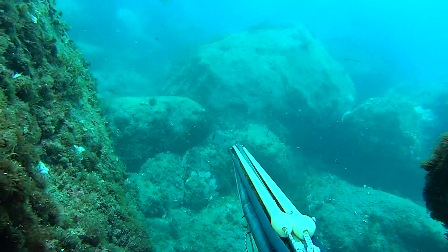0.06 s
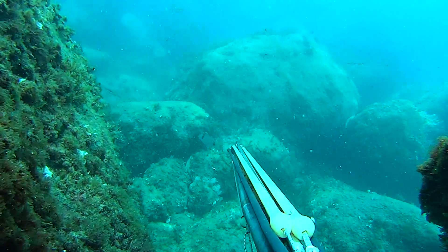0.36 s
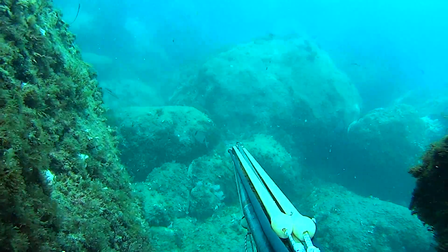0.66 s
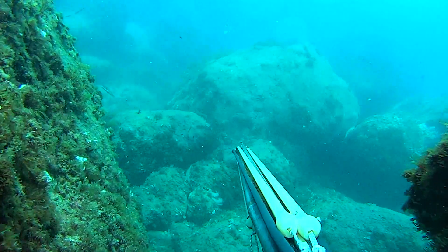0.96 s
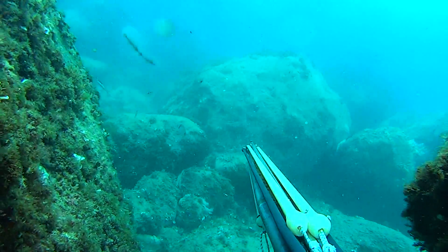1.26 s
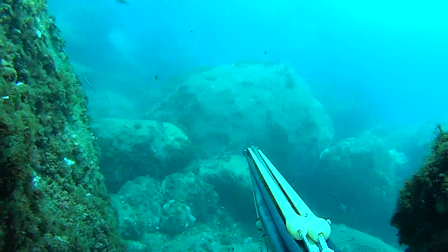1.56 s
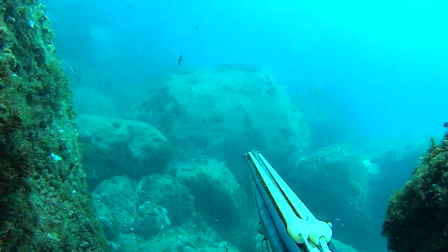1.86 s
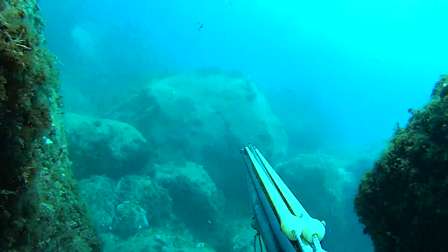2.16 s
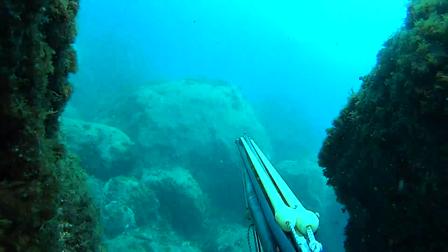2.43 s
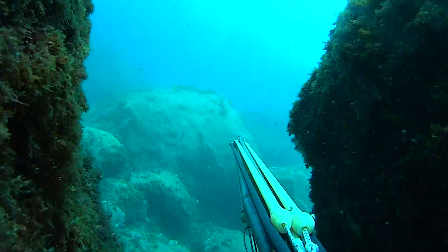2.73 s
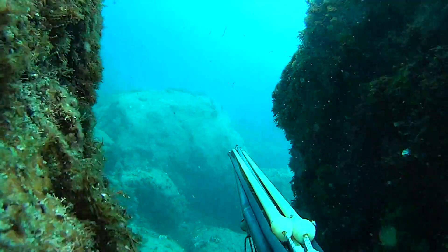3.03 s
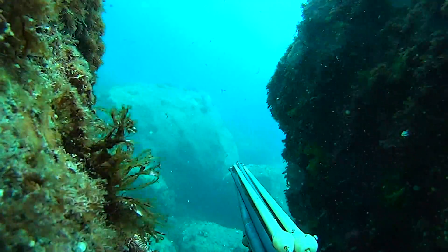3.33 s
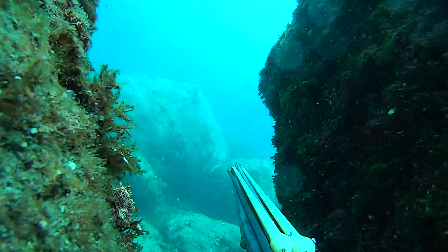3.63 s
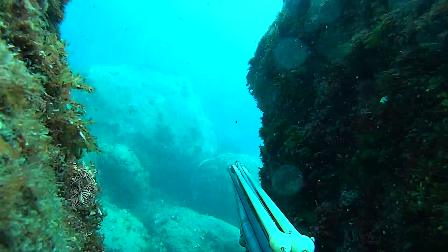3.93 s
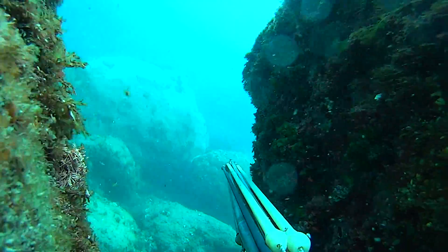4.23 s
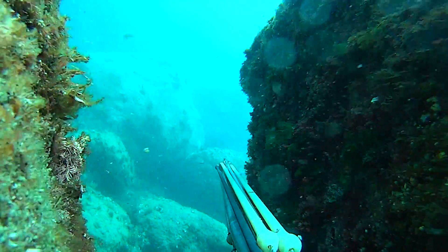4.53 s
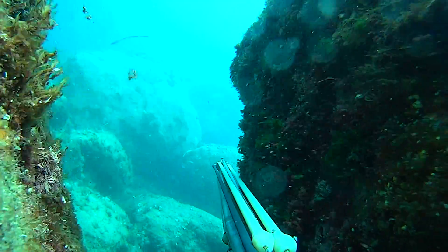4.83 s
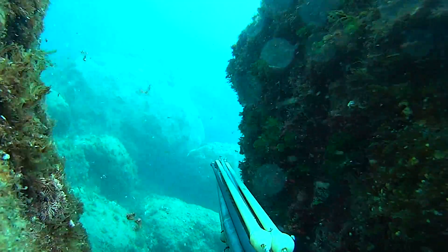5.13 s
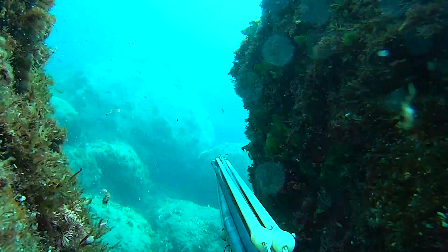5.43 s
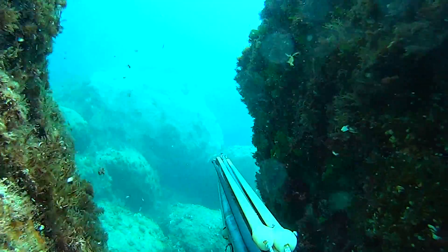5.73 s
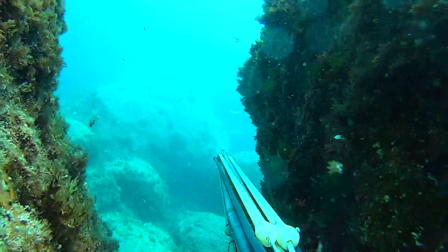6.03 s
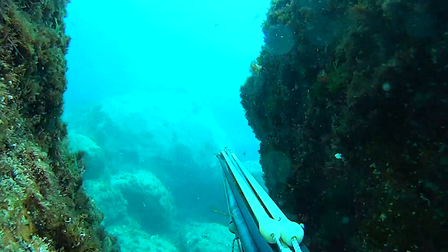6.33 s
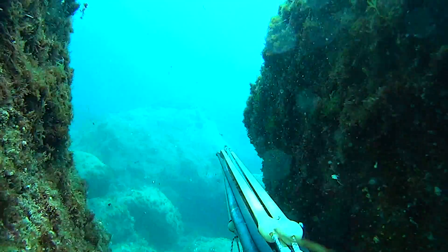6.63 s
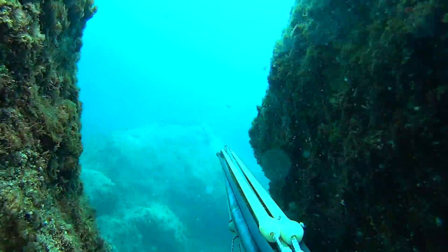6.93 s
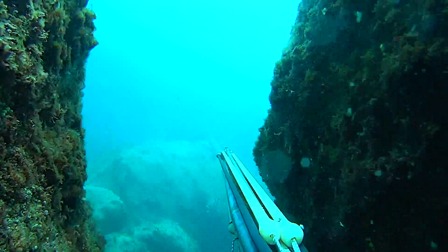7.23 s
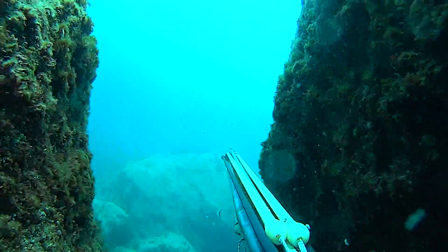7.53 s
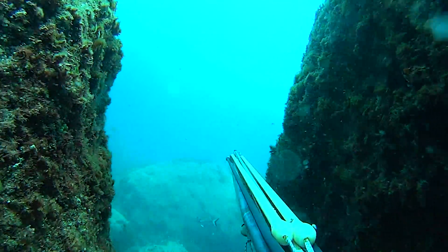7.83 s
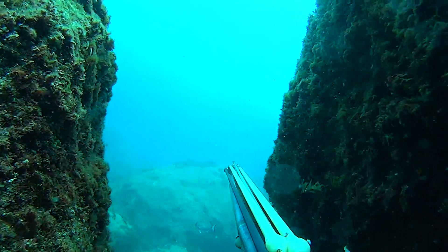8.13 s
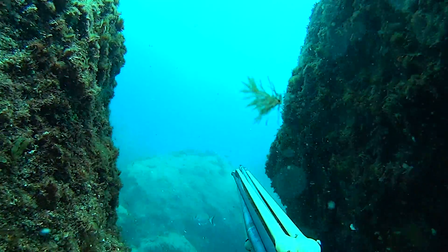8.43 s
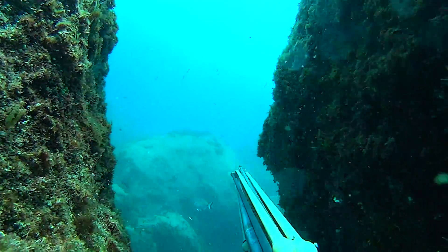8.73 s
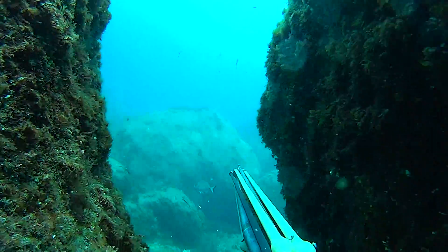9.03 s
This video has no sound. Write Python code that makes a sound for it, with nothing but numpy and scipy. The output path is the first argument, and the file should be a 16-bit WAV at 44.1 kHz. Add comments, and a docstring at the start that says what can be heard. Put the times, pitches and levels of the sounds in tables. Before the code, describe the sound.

Steady crackling clicks of shrimp in the sea, over a low hum that surges as a diver's camera housing bumps along rock.

```python
"""Under water between two rocks, heard through the plastic housing of a diver's camera.
From the start, snapping shrimp crackle all around: their collapsing bubbles ring the housing, and moving
water makes it hum near 600 Hz. At 1.3 s and 4.1 s the diver pulls along the rock: the water surges and
the housing knocks, bumps and scrapes. A brief third pull follows at 5.9 s. At 6 s and 9 s the nearest
snaps land as sharp cracks that make the recorder's limiter duck."""
import sys
import numpy as np
from scipy import signal
from scipy.io import wavfile
from scipy.ndimage import uniform_filter1d, minimum_filter1d

SR = 44100
rng = np.random.default_rng(int(sys.argv[2]) if len(sys.argv) > 2 else 0)


def wrap_up_sound(samples):
    """Save the sound to the file named by the first command line argument, as 16-bit audio."""
    columns = np.atleast_2d(samples).T
    # keep every value between -1 and 1, then stretch to whole-number steps
    tamed = np.clip(columns, -1, 1)
    steps = np.round(tamed * 32767).astype(np.int16)
    wavfile.write(sys.argv[1], SR, steps)


N = 400428

# foreground shrimp snaps, ahead of the layer trims:
# (time [s], echo scatter [ms], level [dB], knock offset [dB], fizz offset [dB], knock pitch [Hz])
SNAPS = [(0.1003, 0.45, -38, -18, -22.5, 2900), (0.1265, 0.9, -38, -12, -17, 2800),
         (0.171, 1, -36.5, -6, -22, 2900), (0.1964, 0.74, -37, -0.5, -21.0, 2790.0),
         (0.2555, 1, -38.5, -6, -20, 2900), (0.469, 1.5, -44.5, -2, -22, 2010),
         (0.5237, 1.9, -26.5, -10.5, -17, 2640), (0.5591, 0.7, -35, -9, -16, 3160.0),
         (0.58, 0.5, -39, -9, -9, 2530.0), (0.5985, 1.3, -34.5, -9, -20.0, 2700),
         (0.62, 4.8, -36, 1, -9, 3000), (0.6319, 0.062, -23, -16, -26, 2570),
         (0.7364, 0.45, -37.0, -9, -22, 3090.0), (0.7869, 1.2, -37, 6, -17, 2600),
         (0.9051, 3.8, -29.5, -15, -28.0, 2740.0), (0.97, 0.61, -36.5, -10, -9, 2820),
         (1.0746, 1.7, -37, -3, -27, 2970), (1.1179, 0.3, -29, -18, -32, 3100.0),
         (1.1307, 3.3, -30.5, -4.0, -24, 3040.0), (1.188, 2, -39.5, -3, -24, 3100),
         (1.264, 0.81, -33, -14, -16, 2980.0), (1.3144, 1.1, -31, -16, -18, 3210.0),
         (1.6168, 3, -32.5, -7, -17, 2200), (1.745, 2.3, -37.0, -8, -12, 3160.0),
         (1.7718, 0.54, -36, -11, -23.0, 2690.0), (1.8179, 1.1, -29, -3, -20.0, 2880),
         (1.9252, 2.0, -32.5, -10, -28.0, 3280.0), (1.9635, 0.62, -34, -14, -13.0, 2780.0),
         (1.9718, 0.52, -26, -20, -29, 3110.0), (2.0215, 1.4, -30, -7, -31, 3240.0),
         (2.0399, 0.05, -27, -30, -7, 3160.0), (2.115, 0.6, -37, -16.0, -8, 3170.0),
         (2.126, 2.5, -32, -7.5, -24, 2680), (2.1801, 1, -30.5, -12, -27.0, 2970.0),
         (2.2796, 0.98, -34, -3, -33, 2900.0), (2.3098, 1.3, -30, -8.5, -28, 3230.0),
         (2.3443, 2.8, -36.0, -20, -24, 3450.0), (2.3695, 4.1, -33, 1, -23, 2960),
         (2.3816, 1.4, -25.5, -7.5, -27.0, 2500), (2.3961, 3.2, -31, -2, -22.0, 2070.0),
         (2.5574, 2.6, -32.5, -12, -13.5, 2330.0), (2.7905, 2.5, -36, -2.5, -16, 2330),
         (2.9122, 1.8, -30.5, 4.5, -23, 3090), (2.96, 0.3, -41, -20, -22, 3100),
         (2.9665, 1.1, -38, 9, -23.0, 1970), (3.0375, 0.15, -34, -9, -19, 3210.0),
         (3.042, 4, -39, -16, -18, 3200), (3.1718, 0.84, -35, -23, -22, 3200.0),
         (3.2812, 0.4, -32, -27, -21, 3240.0), (3.2938, 1.3, -26, -13, -25, 3010.0),
         (3.3362, 0.83, -31.5, -17.0, -29, 3040.0), (3.5031, 1.2, -23.5, -8.5, -26, 2440),
         (3.5572, 2.5, -35.5, 0, -23.0, 2740), (3.6326, 0.34, -37, -11.0, -13, 2940.0),
         (3.6981, 6.9, -34, -9, -34, 2820.0), (3.7473, 4.2, -31.5, -14, -33, 3400.0),
         (3.8118, 0.33, -31, -0.5, -10.5, 2730), (3.8522, 1.6, -24, -3.5, -27, 2920),
         (3.8887, 2.3, -41, -14, -24, 2980.0), (3.9954, 0.1, -36.5, -32, -17, 2620.0),
         (4.0805, 0.96, -32, -6, -28, 1650.0), (4.1742, 2.3, -25.5, -8.5, -18, 3200),
         (4.1821, 0.057, -28.5, -8.5, -3.5, 3120), (4.2346, 0.2, -31.5, -10, -24, 3140.0),
         (4.2765, 1.3, -34.5, -7, -28, 2400), (4.4538, 0.97, -28, -5, -28, 2400),
         (4.4874, 1.1, -32, -11, -23, 2200), (4.53, 1.7, -42, 0, -24, 1600),
         (4.7009, 0.22, -33, -18, -17, 2500.0), (4.7181, 0.4, -35.5, -11.0, -29.0, 2960.0),
         (4.753, 2.7, -27.5, -9.5, -24.0, 2790.0), (4.8317, 0.62, -35, -1, -35, 3220),
         (4.8818, 0.94, -28, -1.5, -32, 2150), (4.9139, 1.5, -35.5, -9, -21, 3130.0),
         (4.98, 2, -40.5, -2.5, -24, 1900), (5.0702, 4.3, -36, -30.0, -23.0, 2570.0),
         (5.1135, 1.4, -27.5, -1.5, -21.0, 1880), (5.135, 1.7, -33.5, -5, -17, 2670),
         (5.209, 2.4, -37.5, -14, -27, 2540), (5.2722, 1.4, -40, -0.5, -30, 2230),
         (5.3026, 5.4, -36, -11, -28, 2330.0), (5.3192, 1.1, -35.5, -6.5, -24, 2060.0),
         (5.3708, 0.6, -27, -9.5, -23, 3000), (5.3864, 1.2, -32, -5.5, -30, 2690.0),
         (5.4288, 0.27, -31, -21, -21, 2520.0), (5.496, 0.6, -31.5, -11.5, -29, 1760.0),
         (5.5324, 0.59, -35.5, -7.5, -22, 2260.0), (5.6001, 2.7, -39, -8, -31, 2290.0),
         (5.632, 2.2, -40, -1, -24, 2000), (5.6473, 0.89, -36.5, -9, -21, 3010.0),
         (5.6718, 1.5, -33, -19.0, -28, 2590.0), (5.771, 2, -40, -2, -24, 2000),
         (5.8481, 2, -32.5, -5.5, -26, 1830), (5.874, 1.7, -39.5, -1.5, -13, 2000),
         (5.9602, 2, -34, 7.5, -23, 2830), (5.9864, 1.3, -27, -8.5, -28.0, 2000),
         (6.0493, 0.045, -12, -28, -16, 3090.0), (6.1043, 0.087, -36.5, -9, -18, 2680.0),
         (6.1605, 0.95, -26, -6, -15, 2170), (6.1937, 4.7, -34.5, -7.0, -26, 1950.0),
         (6.247, 2, -37.5, -3, -24, 2700), (6.3508, 0.2, -34, -26.0, -34.0, 2930.0),
         (6.4473, 0.83, -36, -3.5, -21.0, 1830.0), (6.512, 6.6, -35.5, -2.5, -23, 1900),
         (6.6507, 0.23, -29.5, -14, -29, 3250.0), (6.6816, 2.8, -29, -11, -19.5, 1980),
         (6.7615, 0.81, -29, -10, -16, 2450), (6.9176, 0.4, -36.5, -9, -23.0, 2370.0),
         (7.0248, 0.29, -37, -25.0, -22, 2090.0), (7.2099, 0.6, -38.5, 1, -18, 2410.0),
         (7.2286, 3, -32.5, -3.5, -25, 3040.0), (7.2434, 0.65, -27, -16, -25, 2220),
         (7.331, 1.5, -38, -3, -26, 3100), (7.6401, 1.2, -38.5, -12, -27, 2120.0),
         (7.6771, 1.4, -27, -9, -18, 2960), (7.7102, 0.25, -35.5, -14.0, -22.0, 2360.0),
         (7.8382, 0.086, -41.5, 0, 3, 3120.0), (7.9601, 1.5, -35.5, 9, -30, 2750),
         (8.038, 1.3, -43, -15, -17, 3100), (8.0768, 5.8, -33, -13, -19, 3150.0),
         (8.113, 0.7, -33.5, -25.0, -24, 2590.0), (8.2435, 2.3, -39.5, -2, -22, 2680),
         (8.274, 1.5, -40, -2, -24, 3100), (8.3089, 6.4, -31.5, -9.5, -22.0, 3200.0),
         (8.3524, 5.9, -32.5, -14, -25.0, 3120.0), (8.5315, 0.71, -38.5, 1, -20, 3100.0),
         (8.667, 1.5, -38.5, -3, -24, 3100), (8.6819, 1.7, -33, -11, -27, 1900.0),
         (8.8708, 1, -31, -27, -34, 2950.0), (8.979, 1.2, -39.5, 10.5, -27, 1630.0),
         (9.0086, 0.038, -11.5, -41, -19, 3010.0), (9.0765, 2.4, -26.5, -4, -25, 3230)]
# housing modes that a snap rings: (pitch [Hz], width [Hz], level [dB], right channel gain [signed ratio])
SNAP_MODES = [(1108, 105, 2.5, 0.52), (1625, 125, 5.5, 1), (1910, 96, -0.5, 0.93), (2360, 160, -4, 1),
              (3040, 290, 1, 0.96), (4120, 2800, -5, 0.99), (3901, 2370, -3, 0.72), (4741, 346, 7.5, 0.88),
              (5750, 980, -13, 0.94), (6201, 1640, -15.5, 0.78), (7400, 710, -11, 0.2),
              (8250, 990, -22.5, -0.35), (9040, 510, -23, 0.56), (9820, 370, -26, 0.26),
              (10750, 390, -30.5, 0.34)]
# fader ride on the far colony: (time [s], gain [dB])
COLONY_RIDE = [(0, -1.5), (1.2, 1.5), (2.4, 2.5), (3.05, -3), (3.7, 4), (4.4, 0.5), (5.8, 1.5), (7.2, 1),
               (9.08, 1)]
# low housing modes that water and knocks ring: (pitch [Hz], width [Hz], level [dB])
HUM_MODES = [(453, 82, -12), (578.2, 28.2, 2), (605.1, 20.7, 3), (766, 48, -17.5), (1071, 57, -14.5)]
# light knocks on the housing: (time [s], relative level [dB])
KNOCKS = [(1.288, -22), (1.308, -22.5), (1.3125, -22.5), (1.3645, -18.5), (1.373, -25), (1.398, -31),
          (1.413, -29), (1.455, -25), (1.47, -21), (4.091, -29), (4.11, -26), (4.167, -25), (4.283, -29),
          (4.32, -27), (4.352, -29), (4.385, -29), (4.597, -29)]
# soft bumps on the housing: (peak time [s], pitch [Hz], length [s], relative level [dB])
BUMPS = [(1.236, 235, 0.015, -38), (1.528, 23.5, 0.057, -33), (1.712, 234, .013, -40.5),
         (1.96, 190, 0.032, -42), (2.007, 207, 0.023, -27.5), (2.045, 120, 0.025, -42),
         (3.097, 188, 0.04, -40), (3.518, 227, 0.023, -36), (3.589, 215, 0.015, -35),
         (4.106, 447, 0.025, -26.5), (4.098, 182, 0.015, -36), (4.504, 240, 0.017, -37.5),
         (4.61, 107, .011, -33), (7.665, 103, 0.015, -39.5), (7.971, 235, 0.012, -34.5),
         (8.615, 272, 0.045, -41)]
# the housing brushes the rock: (peak time [s], length [s], level [dB])
SCRAPES = [(1.543, 0.043, -33.5), (4.099, 0.028, -31.5)]
# the diver pulls forward and the water surges: (start [s], hold [s], hum rise [dB])
PULLS = [(1.258, 0.27, 10.3), (4.066, 0.4, 6), (5.905, 0.044, 5)]
# slow ride of the passing water: (time [s], relative wash level [dB], relative hum level [dB])
FLOW_RIDE = [(0, -51, -48), (1.1, -50.5, -52.5), (1.8, -45.5, -50.5), (2.349, -44.5, -45),
             (2.85, -50, -49.5), (3.7, -46.5, -46), (4.5, -46, -41), (4.95, -48.5, -41), (5.3, -49, -40),
             (6.4, -42, -42), (7.0, -47.5, -39.5), (7.6, -44.5, -43.5), (9.08, -44, -42.5)]
# tone of the deep wash: (frequency [Hz], relative density [dB])
WASH_SPECTRUM = [(15.7, -4), (30, 4.5), (55, -11.5), (105, -3), (160, -6.5), (215, -1), (295, -1),
                 (365, -12.5), (480, -2.5), (640, -17.5), (800, -18)]
# tone of the midrange swish: (frequency [Hz], relative density [dB])
SWISH_SPECTRUM = [(450, 38), (750, -10), (930, -9), (1100, 9), (1400, 5), (2200, 9.5)]
# stereo image of the water: (frequency [Hz], left-right correlation [0-1])
WATER_CORRELATION = [(30, 1), (100, 0.9), (220, 0.92), (360, 0.056), (500, 0.82), (620, 0.19), (900, 0.067),
                     (1500, 0.053)]

LAYER_EDGES_HZ = [3900, 6200]   # split the snap modes into low knock, main ring and top fizz


def near_shrimp(knock_trim_db, ring_trim_db, fizz_trim_db, correlation):
    """Each snap rings the housing with its own balance of low knock, main ring and top fizz."""
    out = np.zeros((2, N + SR))
    mode_hz = np.array(SNAP_MODES)[:, 0]
    layer = np.digitize(mode_hz, LAYER_EDGES_HZ)
    for s, scatter_ms, db, knock_db, fizz_db, pitch_hz in np.vstack([SNAPS, weak_snaps()]):
        pressure = bubble_collapse(scatter_ms, direct=0.5, build=0.4, tail=0.47, tail_ms=15.8, clump_db=3)
        rings = housing_rings(stereo(*pressure, correlation), detune_share=0.029)
        # the knock favours the modes near its pitch; every snap meets the modes a little differently
        octaves_off = np.log2(mode_hz / pitch_hz)
        weight = np.where(layer == 0, 0.37 + np.exp(-.5 * (octaves_off / 0.26) ** 2), 1)
        weight *= from_db(rng.normal(size=len(mode_hz)))
        rings *= weight[:, None, None]
        knock, ring, fizz = [rings[layer == k].sum(axis=0) for k in range(3)]
        knock = low_pass(dry_knock(knock, pitch_hz, scatter_ms, correlation), 2.3 * pitch_hz, order=3)
        treble_hz = 5830 * (1 + 0.033 / max(scatter_ms, .2))   # direct snaps keep their treble
        ring = low_pass(ring, treble_hz, order=4)
        parts = [(knock, knock_db + knock_trim_db), (ring, ring_trim_db), (fizz, fizz_db + fizz_trim_db)]
        start = int(s * SR)
        for part, part_db in parts:
            rms = np.sqrt(np.sum(part ** 2) / (2 * .01 * SR))   # as if all its energy fell in 10 ms
            out[:, start:start + part.shape[1]] += from_db(db + part_db) * part / rms
    return out[:, :N]


def weak_snaps(per_s=7.6):
    """Random snaps in the middle distance, spread about one typical snap; rows as in SNAPS."""
    count = int(per_s * N / SR)
    chance = rng.normal(size=(200, 5))[:count]
    times = rng.random(200)[:count] * N / SR
    scatter_ms = 1.9 * 2 ** (0.45 * chance[:, 0])
    levels_db = np.array([-39.5, -9, -23]) + 2.5 * chance[:, 2:]
    pitch_hz = 2800 * 2 ** (0.08 * chance[:, 1])
    return np.column_stack([times, scatter_ms, levels_db, pitch_hz])


def bubble_collapse(scatter_ms, direct, build, tail, tail_ms, clump_db, count=2600):
    """One pressure spike, then dense echoes off the rock and a faint longer tail, as mid and side."""
    ms = np.arange(count) * 1000 / SR
    early = np.exp(-ms / max(1.6 * scatter_ms - .25, .1))
    late = tail * min(scatter_ms / 2, 1) * np.exp(-ms / tail_ms)
    echoes = rng.standard_normal((2, count)) * (early + late)
    echoes *= 1 - np.exp(-(ms + ms[1]) / (build * scatter_ms))   # echoes take a moment to build
    clumps = np.interp(ms / 1.46, np.arange(count), rng.uniform(-1.7, 1.7, count))   # one per rock face
    echoes *= from_db(clump_db * clumps)
    echoes /= np.sqrt(np.sum(echoes ** 2, axis=1, keepdims=True))
    echoes[0, 0] += direct / max(scatter_ms, .3)   # near snaps are mostly spike
    return echoes


def dry_knock(rings, pitch_hz, scatter_ms, correlation, crack_width_hz=2100, crack_db=-5.5):
    """The lower snap modes ring over a broad crack of rock echoes, and both stop short."""
    echoes = bubble_collapse(scatter_ms, direct=0, build=0.63, tail=0.6, tail_ms=16, clump_db=2)
    crack = from_db(crack_db) * resonate_twice(stereo(*echoes, correlation), 0.9 * pitch_hz, crack_width_hz)
    ms = np.arange(rings.shape[1]) * 1000 / SR
    hold_ms = 12 + 2.8 * scatter_ms
    return (rings + crack) / (1 + (ms / hold_ms) ** 3)


def housing_rings(pressure, detune_share):
    """Every snap mode rings, its pitch a little different from snap to snap."""
    return np.array([housing_mode(pressure, k, 1 + detune_share * rng.uniform(-1.2, 1))
                     for k in range(len(SNAP_MODES))])


def housing_mode(pressure, k, detune=1):
    """One snap mode rings in stereo; the top modes reach the two microphone ports unequally."""
    hz, width, db, right = SNAP_MODES[k]
    return (-1) ** k * from_db(db) * resonate(pressure, hz * detune, width) * np.array([[1], [right]])


def far_shrimp(per_s, spread_db, smear_s, tilt_db_per_octave, correlation, colour_db, cluster_db, detune=1):
    """A colony snaps in loose clusters; distance smears each snap into a burst of its own colour."""
    onsets = np.flatnonzero(rng.random(N) < per_s * from_db(cluster_db * drift(5)) / SR)
    colours = rng.normal(size=(20000, 3))[np.arange(len(onsets)) % 20000]
    size_db = spread_db * np.minimum(rng.exponential(1, N), 3)[onsets]
    noise = stereo(*rng.standard_normal((2, N)), correlation)
    bursts = []
    for colour in colours.T:   # knock, ring and fizz each get their own strength
        power = np.zeros(N)
        power[onsets] = from_db(size_db + colour_db * np.clip(colour, -2, 2)) ** 2
        smeared = signal.lfilter([1], [1, -np.exp(-2 / (smear_s * SR))], power + 1e-18)
        bursts.append(noise * np.sqrt(smeared))
    rings = 0
    for k, (hz, *_) in enumerate(SNAP_MODES):
        tilt = from_db(tilt_db_per_octave * np.log2(hz / SNAP_MODES[0][0]))
        rings += tilt * housing_mode(bursts[np.digitize(hz, LAYER_EDGES_HZ)], k, detune)
    return rms_one(rings)


def reef_fizz(low_cut_hz, correlation, flicker_db):
    """The farthest snaps blend into a fine, flickering top fizz."""
    low_cut = signal.butter(4, low_cut_hz, "high", fs=SR, output="sos")
    hiss = signal.sosfilt(low_cut, rng.standard_normal((2, N)))
    return rms_one(stereo(*hiss, correlation) * from_db(flicker_db * drift(60)))


def housing_hum(side_db, swell_db, swell_hz):
    """Turbulence keeps the hum modes ringing in irregular swells, almost mono."""
    mid, side = hum_modes(rng.standard_normal((2, N)) * from_db(swell_db * drift(swell_hz)))
    return rms_one(mid + from_db(side_db) * side * np.array([[1], [-1]]))


def hum_modes(push, sign=-1, width_scale=1):
    """The housing's low ringing: modes alternate in polarity, or start in step with sign=1."""
    rings = sum(sign ** k * from_db(db) * resonate(push, hz, width * width_scale)
                for k, (hz, width, db) in enumerate(HUM_MODES))
    return signal.sosfilt(signal.butter(2, [330, 1300], "band", fs=SR, output="sos"), rings)


def housing_knocks(trim_db, contact_hz):
    """Each knock is one soft push on the hum modes: a quick attack, then a dying ring."""
    hits = np.zeros(N)
    for s, db in KNOCKS:
        hits[int(s * SR)] = from_db(db + trim_db)
    contact = low_pass(signal.unit_impulse(SR // 5), contact_hz)
    ring = hum_modes(contact, sign=1, width_scale=0.9)
    return signal.fftconvolve(hits, ring / np.abs(ring).max())[:N]


def housing_bumps(trim_db, width_share, side_share):
    """Soft contacts swell and fade as dull thuds of narrow-band noise."""
    out = np.zeros((2, N))
    for s, hz, length, db in BUMPS:
        span = np.arange(max(int((s - 4 * length) * SR), 0), min(int((s + 4 * length) * SR), N))
        shape = swell(span / SR, s, length)
        thud = resonate_twice(rng.standard_normal((2, SR)), hz, width_share * hz)[:, -len(span):] * shape
        thud *= np.sqrt(np.sum(shape ** 2) / np.sum(thud ** 2, axis=1, keepdims=True))
        correlation = 1 - side_share * min(hz / 200, 1)   # deep bumps reach both sides alike
        out[:, span] += from_db(db + trim_db) * stereo(*thud, correlation)
    return out


def rock_scrapes(t, hiss_hz, body_hz, body_db, ring_db, correlation):
    """Weed and rock brush the housing: hiss over a fuller body that rings the two lowest snap modes."""
    hiss, body = rng.standard_normal((2, 2, N))
    scrape = low_pass(hiss, hiss_hz, order=5) + from_db(body_db) * low_pass(body, body_hz)
    scrape += from_db(ring_db) * (housing_mode(body, 0) + housing_mode(body, 1))
    envelope = sum(from_db(db) * swell(t, s, length) for s, length, db in SCRAPES)
    return envelope * rms_one(stereo(*scrape, correlation))


def pull_surge_db(t, attack_s, release_s):
    """Each pull speeds the water up, holds and lets it settle."""
    return sum(db * np.interp(t, [s - attack_s, s, s + hold, s + hold + release_s], [0, 1, 1, 0])
               for s, hold, db in PULLS)


def turbulence(spectrum, patchy_db):
    """The bed of moving water: half-octave bands of noise, each surging on its own."""
    out = 0
    white = rng.standard_normal((2, 2, N))
    for k, low in enumerate(2 ** np.arange(np.log2(spectrum[0][0]), np.log2(spectrum[-1][0]), .5)):
        centre_hz = low * 2 ** .25
        band_pass = signal.butter(2, [low, low * np.sqrt(2)], "band", fs=SR, output="sos")
        band = stereo(*signal.sosfilt(band_pass, white[k % 2]), at_hz(WATER_CORRELATION, centre_hz))
        out += from_db(at_hz(spectrum, centre_hz) + patchy_db * drift(10.8)) * band
    return rms_one(out)


def delay_right(pair, ms):
    """The sound reaches the right port slightly later."""
    samples = np.arange(N)
    return np.array([pair[0], np.interp(samples - ms * SR / 1000, samples, pair[1])])


def swell(t, peak_s, length_s):
    """An envelope that grows and fades evenly about its peak."""
    return 1 / np.cosh(np.clip(1.67 * (t - peak_s) / length_s, -30, 30))


def drift(corner_hz, step=40):
    """Smooth random modulation with rms near 1."""
    pole = np.exp(-2 * np.pi * corner_hz * step / SR)
    slow = signal.lfilter([1], [1, -2 * pole, pole * pole], rng.standard_normal(N // step + 2002))[2000:]
    return np.interp(np.arange(N) / step, np.arange(len(slow)), rms_one(slow))


def resonate(x, hz, width_hz):
    """A resonance with gain 1 at its peak."""
    r = np.exp(-np.pi * width_hz / SR)
    feedback = [1, -2 * r * np.cos(2 * np.pi * hz / SR), r * r]
    return signal.lfilter(np.array([1, 0, -1]) * (1 - r * r) / 2, feedback, x + 1e-18)


def resonate_twice(x, hz, width_hz):
    """Two resonances in series, for steeper skirts."""
    return resonate(resonate(x, hz, width_hz), hz, width_hz)


def low_pass(x, hz, order=2):
    """Roll off the treble."""
    return signal.sosfilt(signal.butter(order, min(hz, .45 * SR), fs=SR, output="sos"), x)


def stereo(mid, side, correlation):
    """Two unrelated signals to a pair with the given correlation."""
    left_right = np.array([[1], [-1]])
    return (np.sqrt(1 + correlation) * mid + np.sqrt(1 - correlation) * side * left_right) / np.sqrt(2)


def at_hz(curve, hz):
    """Read a curve on a log-frequency axis."""
    frequencies, values = np.transpose(curve)
    return np.interp(np.log(hz), np.log(frequencies), values)


def from_db(db):
    """Decibels to gain."""
    return 10 ** (np.asarray(db) / 20)


def rms_one(x):
    """Scale to rms 1."""
    return x / np.sqrt(np.mean(x ** 2) + 1e-20)


def limiter(x, ceiling_db, release_db_per_s):
    """The gain drops at once on a peak and climbs back steadily."""
    over_db = np.maximum(20 * np.log10(np.abs(x).max(axis=0) + 1e-9) - ceiling_db, 0)
    ramp_db = release_db_per_s * np.arange(N) / SR
    cut_db = np.maximum.accumulate(over_db + ramp_db) - ramp_db
    return x * from_db(uniform_filter1d(minimum_filter1d(-cut_db, size=25), size=25))


def scene():
    """Shrimp over a bed of water and housing noise, all leaning a little to the right."""
    t = np.arange(N) / SR
    flow_s, *rides = np.transpose(FLOW_RIDE)
    wash_db, hum_db = [np.interp(t, flow_s, ride) + 2 for ride in rides]
    surge_db = pull_surge_db(t, attack_s=0.026, release_s=0.23)
    wash = from_db(wash_db + 0.5 * surge_db) * turbulence(WASH_SPECTRUM, patchy_db=2.5)
    hum = from_db(hum_db + surge_db) * housing_hum(side_db=-26, swell_db=2.5, swell_hz=20.7)
    knocks = housing_knocks(trim_db=1.5, contact_hz=1050)
    swish = from_db(-48.5 + 0.3 * surge_db) * turbulence(SWISH_SPECTRUM, patchy_db=3.5)
    bumps = housing_bumps(trim_db=2, width_share=0.46, side_share=0.19)
    scrapes = rock_scrapes(t, hiss_hz=1500, body_hz=448, body_db=1, ring_db=-9, correlation=0.79)
    bed = wash + delay_right(hum + knocks, ms=0.18) + swish + bumps + scrapes

    pops = far_shrimp(per_s=32, spread_db=1.5, smear_s=0.013, tilt_db_per_octave=1.5,
                      correlation=0.75, colour_db=5.5, cluster_db=3.5)
    ticks = far_shrimp(per_s=190, spread_db=3, smear_s=0.0008, tilt_db_per_octave=3.5,
                       correlation=0.92, colour_db=4, cluster_db=5, detune=1.035)
    sizzle = far_shrimp(per_s=1700, spread_db=-8, smear_s=0.012, tilt_db_per_octave=8.5,
                        correlation=0.66, colour_db=7.5, cluster_db=3, detune=0.99)
    fizz = reef_fizz(low_cut_hz=7400, correlation=0.46, flicker_db=3)
    colony = from_db(-51) * pops + from_db(-48.3) * ticks + from_db(-46.7) * sizzle + from_db(-62.3) * fizz
    shrimp = colony * from_db(np.interp(t, *np.transpose(COLONY_RIDE)))
    shrimp += near_shrimp(knock_trim_db=2, ring_trim_db=1.43, fizz_trim_db=6.5, correlation=0.81)
    shrimp -= 0.77 * resonate(shrimp, hz=2790, width_hz=246)   # a dead band between two housing modes
    return bed * from_db([[-.55], [.55]]) + shrimp * from_db([[-1.05], [1.05]])


def record(dry):
    """The limiter catches the nearest snaps; a steep filter cuts the top at 11050 Hz."""
    held = limiter(dry, ceiling_db=-4.5, release_db_per_s=227)
    return signal.sosfilt(signal.ellip(10, .2, 70, 11050, fs=SR, output="sos"), held)


dry = scene()
out = record(dry)
wrap_up_sound(out)
```